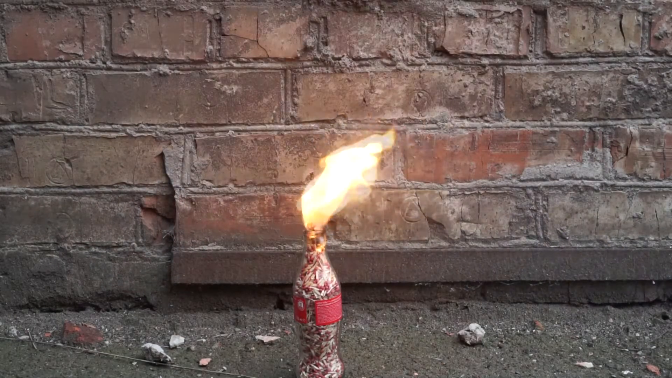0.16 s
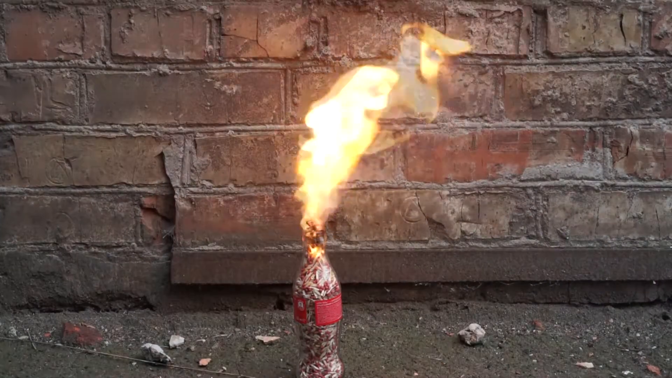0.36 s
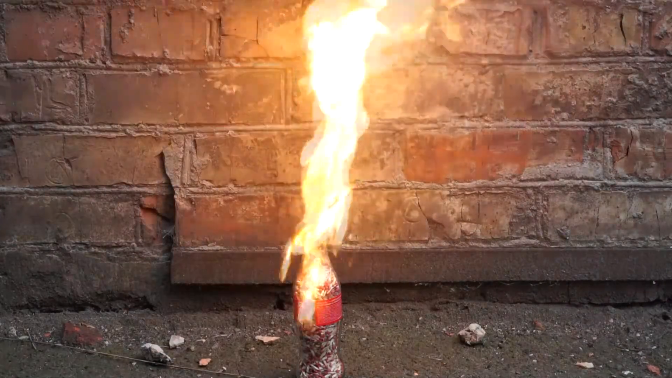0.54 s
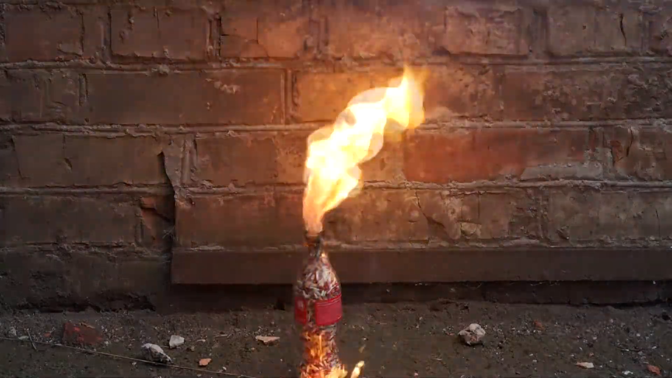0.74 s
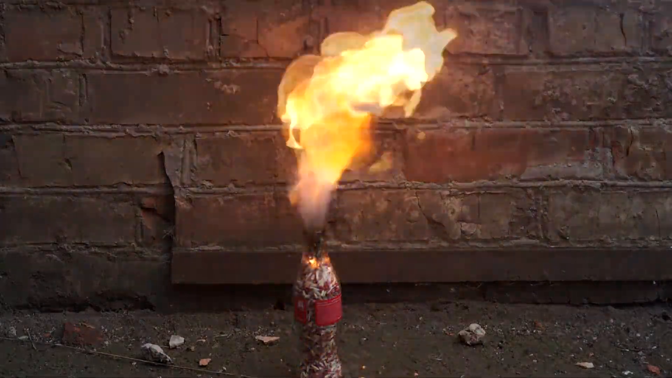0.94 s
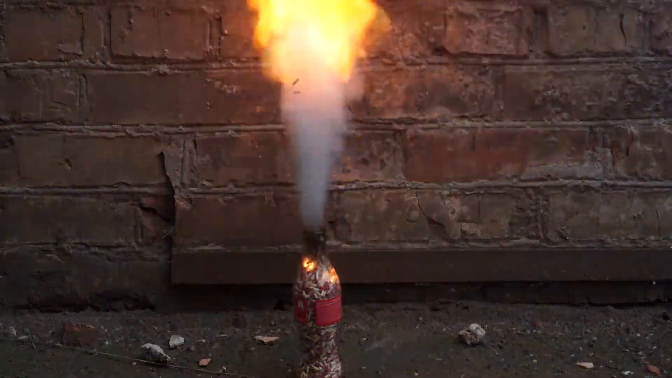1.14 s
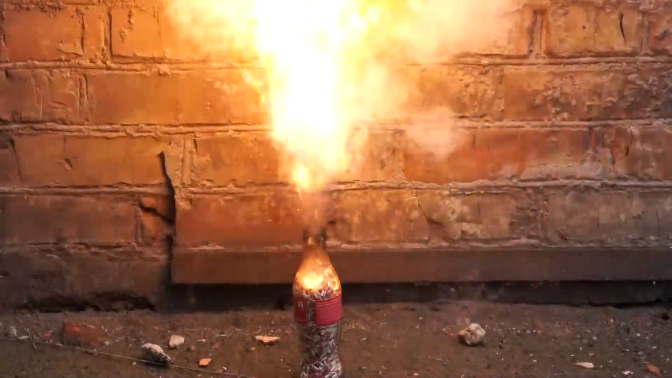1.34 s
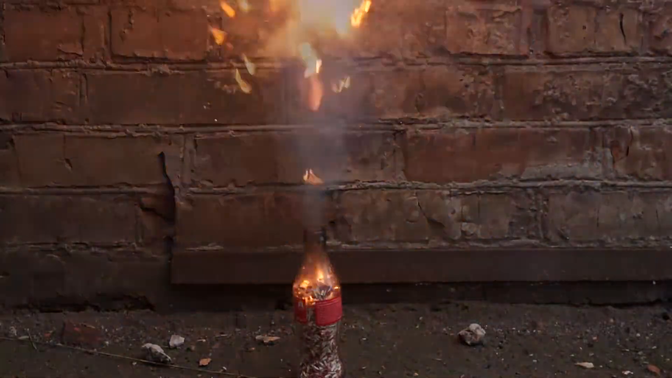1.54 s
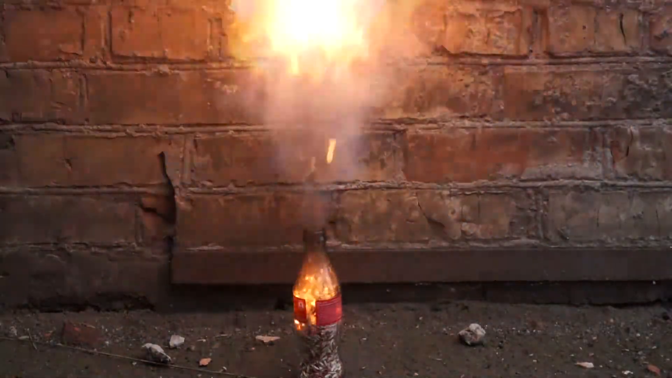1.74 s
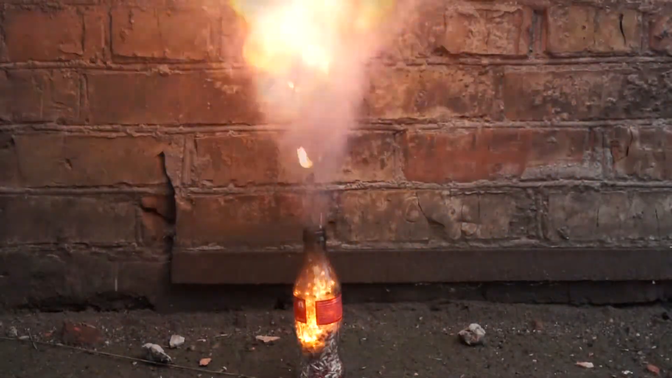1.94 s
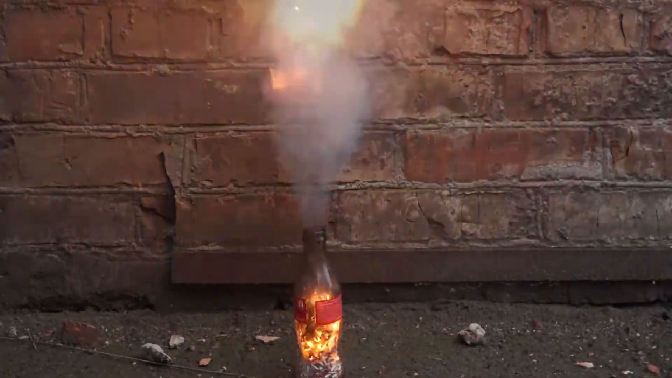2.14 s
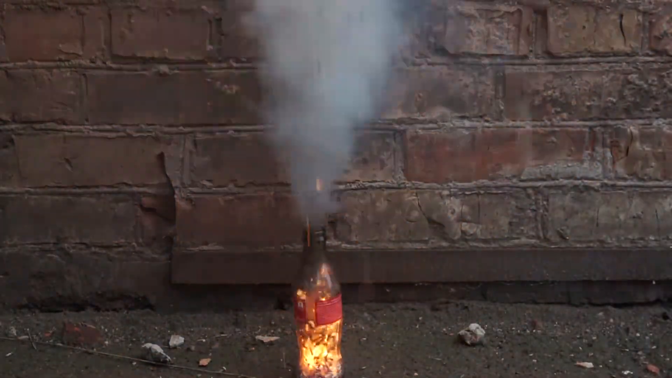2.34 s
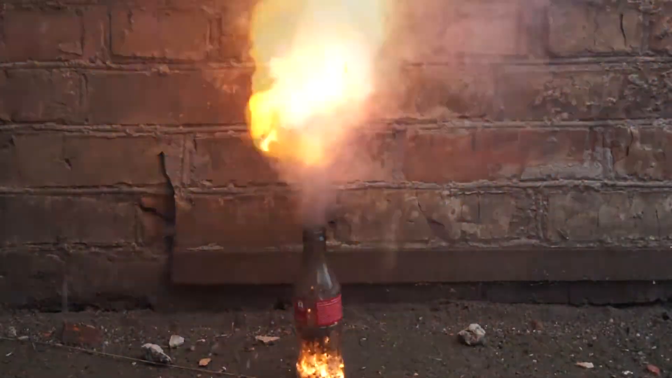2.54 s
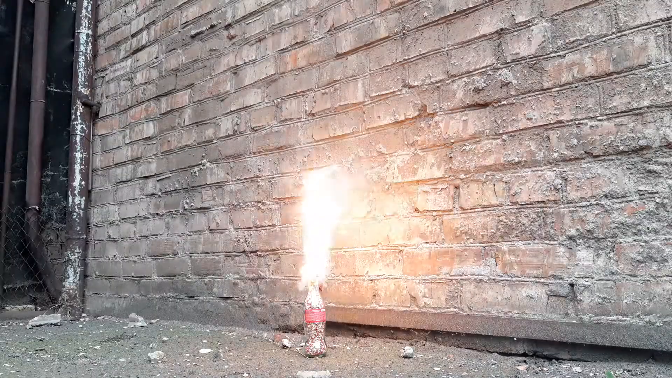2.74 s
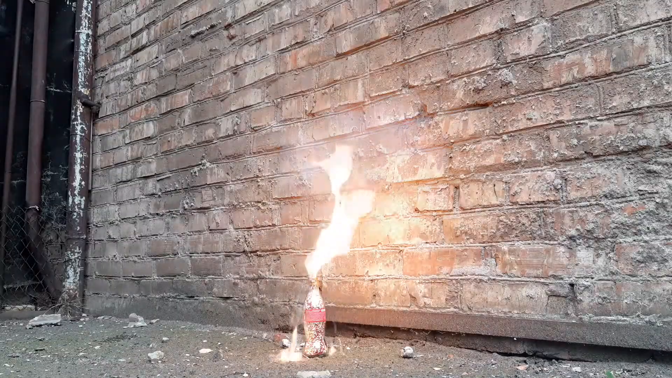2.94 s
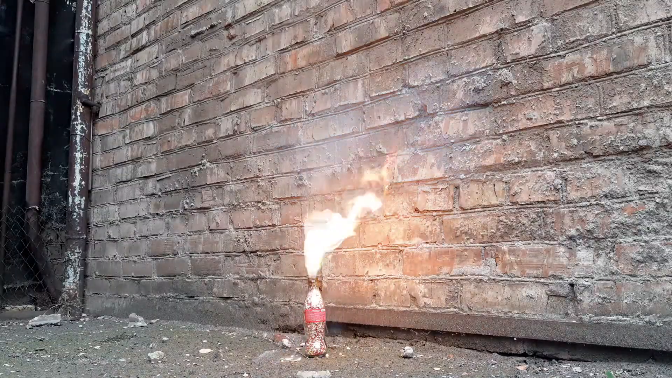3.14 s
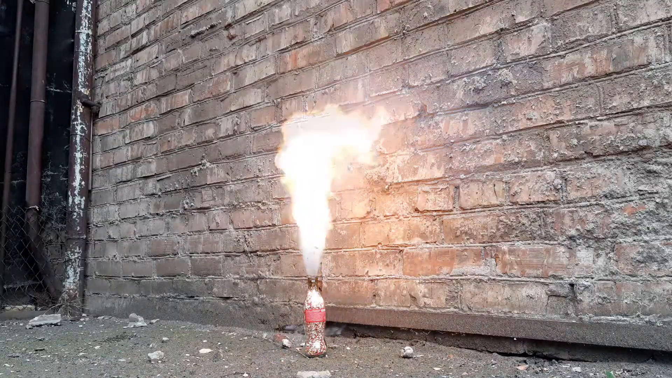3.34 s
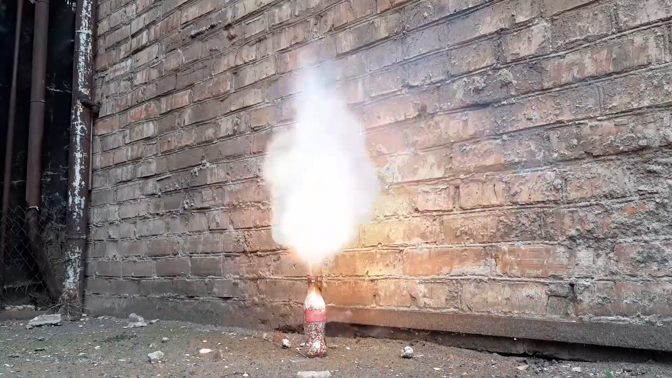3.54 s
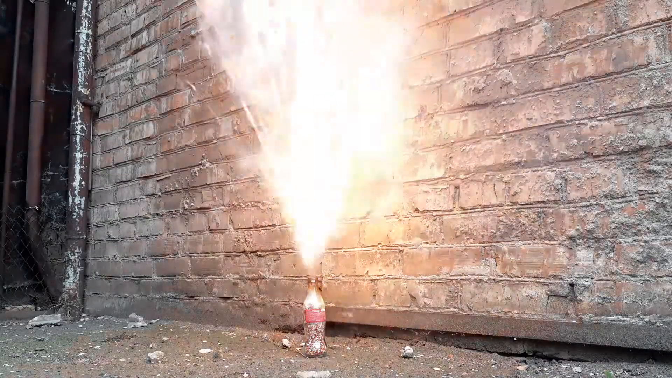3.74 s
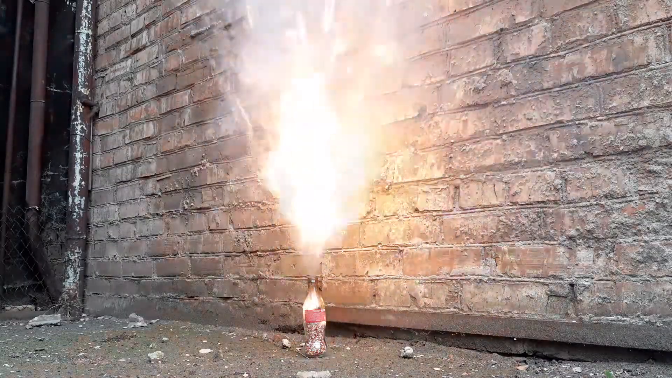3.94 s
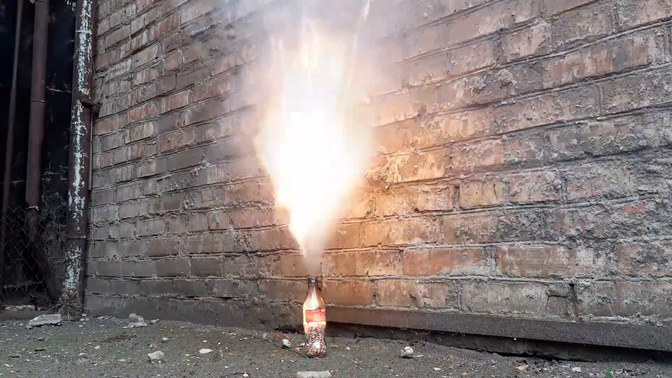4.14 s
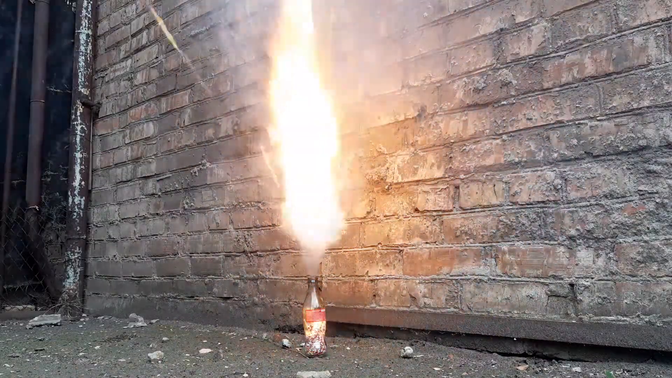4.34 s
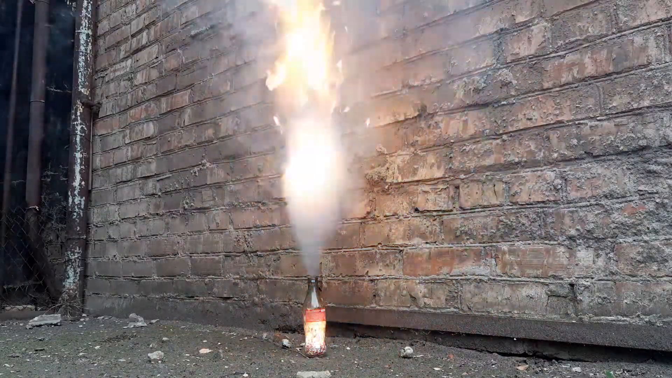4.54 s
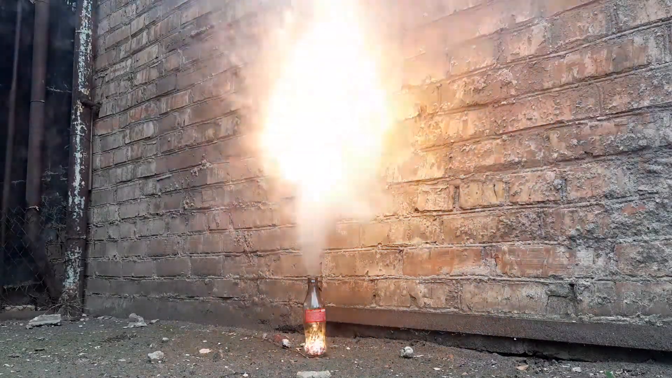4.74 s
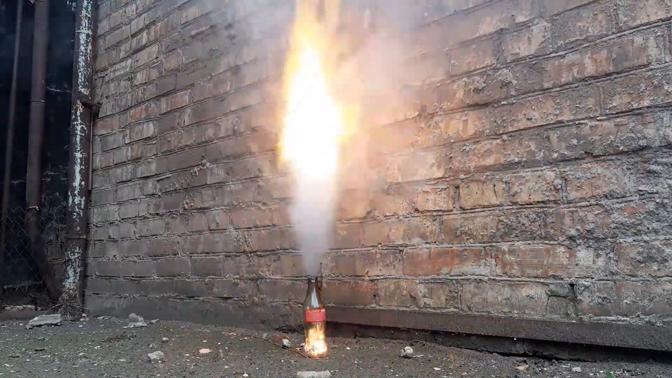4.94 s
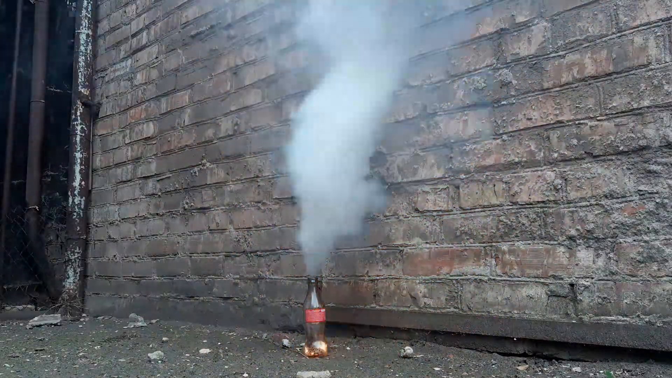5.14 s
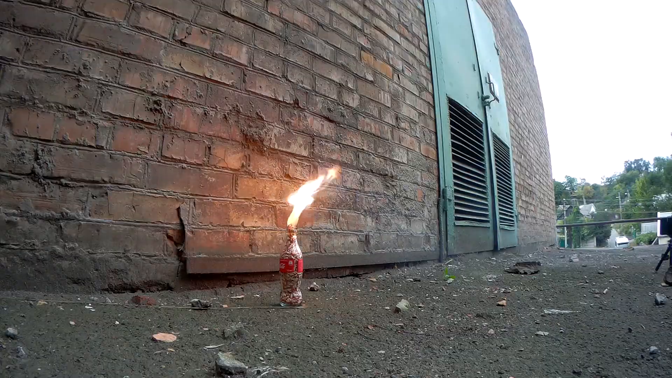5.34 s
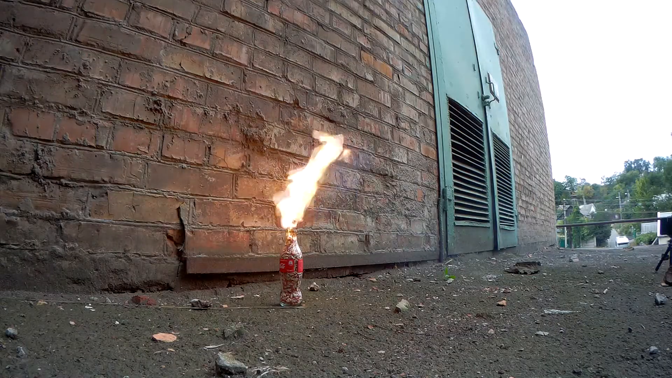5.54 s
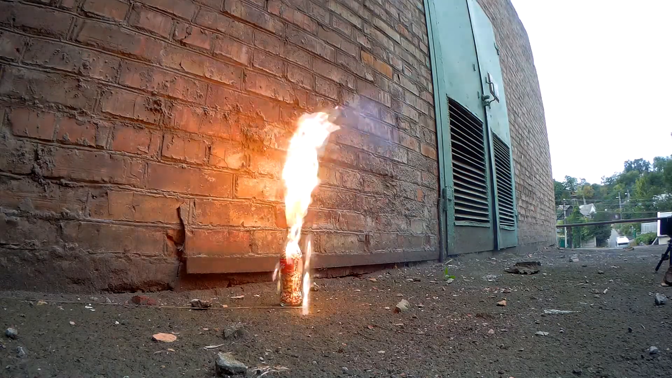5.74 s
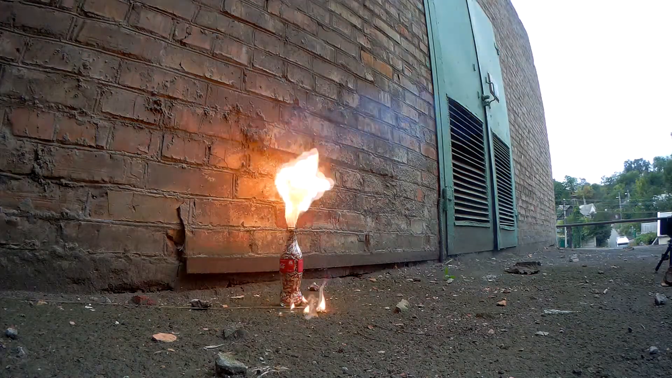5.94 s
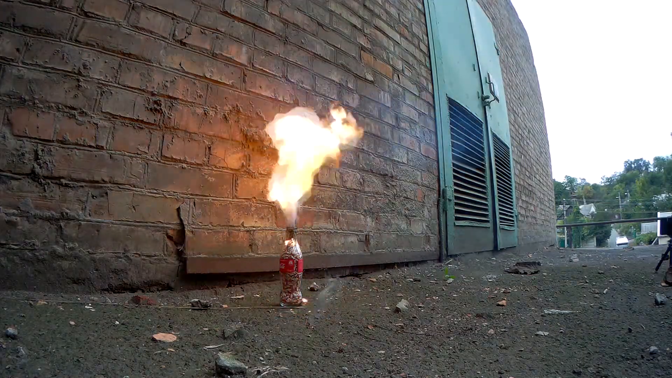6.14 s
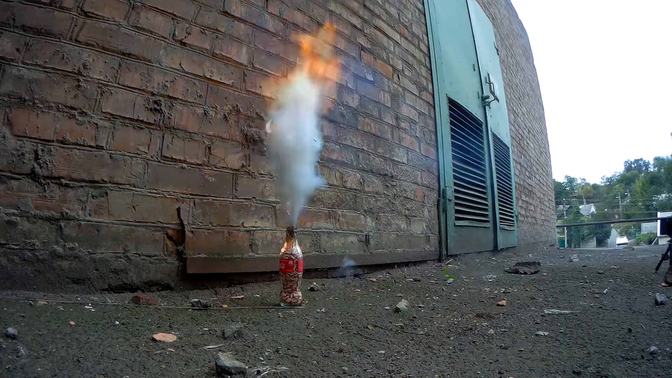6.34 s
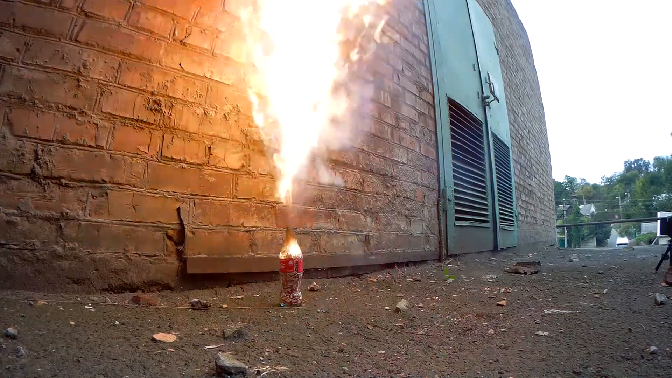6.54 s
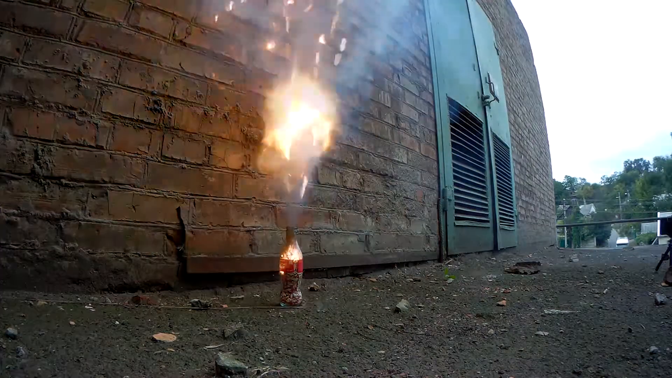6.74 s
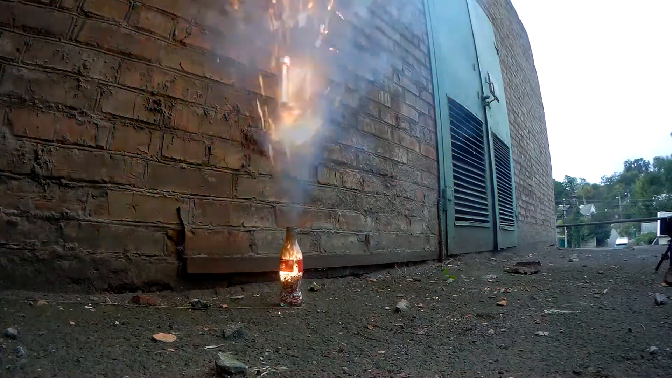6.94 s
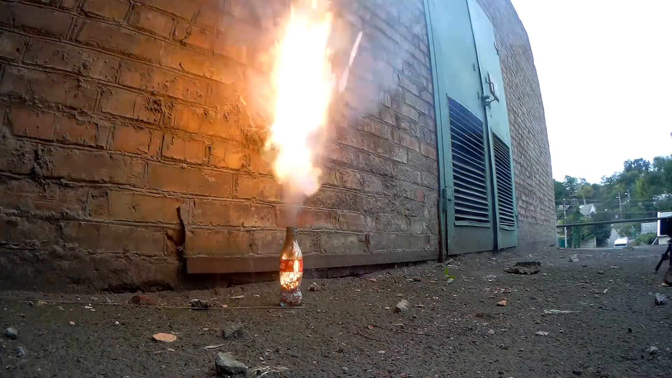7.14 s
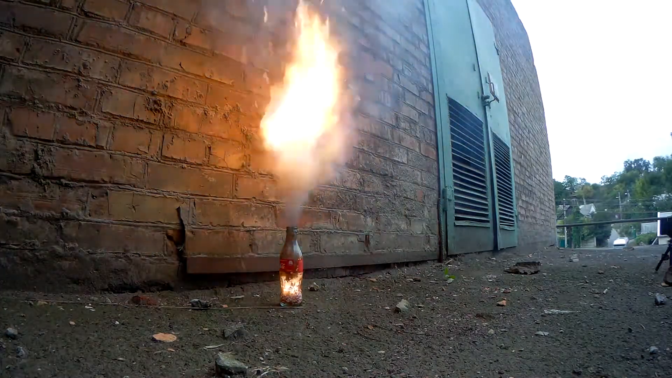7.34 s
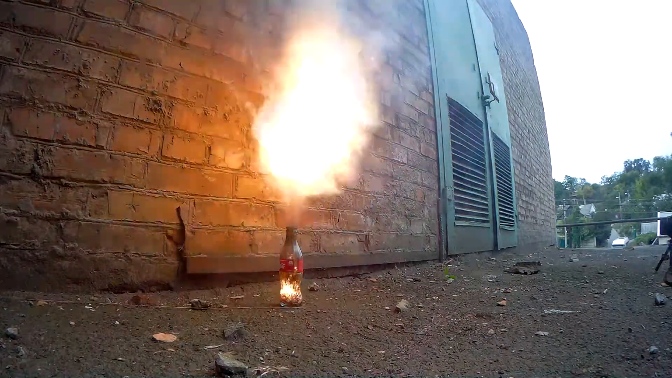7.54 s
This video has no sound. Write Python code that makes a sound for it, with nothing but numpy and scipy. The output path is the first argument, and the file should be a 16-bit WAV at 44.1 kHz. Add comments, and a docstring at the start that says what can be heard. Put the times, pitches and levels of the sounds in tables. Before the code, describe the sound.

Three bottles of match heads burn in turn outdoors, each small flame flaring, then erupting into a hissing, fluttering roar with thumping puffs and snaps.

```python
"""In front of a brick wall, three plastic bottles packed with match heads burn, each in a scene of its own; the
scene changes at 2.58 s and 5.21 s. Each starts with a small flame that flares once; then the whole load
catches, roars up and burns down. The flames are layers of shaped noise. Gas hisses out of the neck as brighter
noise, coloured by the bottle, and its spurts lift the flame off until it catches again with a whump. Pressure
pulses make the puffs, a few sharp snaps cut through, and the strongest puffs overload the microphone."""
import sys
import numpy as np
from scipy import signal
from scipy.fft import rfft, irfft, next_fast_len
from scipy.io import wavfile
from scipy.ndimage import uniform_filter1d, map_coordinates

SR = 44100
rng = np.random.default_rng(int(sys.argv[2]) if len(sys.argv) > 2 else 0)


def put_to_file(sound):
    """Save the sound as 16-bit audio at rate SR, in the file named by the first command-line argument."""
    columns = np.atleast_2d(sound).T  # one column per channel
    safe = np.clip(columns, -1, 1)
    whole_steps = np.round(safe * 32767)
    wavfile.write(sys.argv[1], SR, whole_steps.astype(np.int16))


N = 338688
TIME = np.arange(N) / SR

# stereo width at each bottle, the last one mono: (frequency [Hz], side relative to mid [dB])
WIDTH = [
    [(60, -24), (200, -19.5), (400, -7), (800, -11), (4400, -8.5), (15000, -9.5)],
    [(60, -26), (200, -25), (380, -14.5), (700, -7.5), (2400, -9), (4400, -2), (8100, 2), (15000, 6.5)],
    [(60, -120), (15000, -120)],
]
# each burn, roar levels before the mix: (time the load catches [s], growth time [s], time it dies [s],
# small flame [dB], full roar [dB], sag [dB/s])
BURNS = [(0.93, 0.089, 2.57, -41, -12.5, 2.5), (3.17, 0.14, 4.965, -52, -6, 5.5),
         (6.02, 0.15, 7.65, -53.5, -5.5, 3.5)]
# spurts of gas that lift the flame off the neck: (time it catches again [s], time lifted [s],
# drop of the roar [dB], swell of the hiss [dB])
SPURTS = [(1.324, 0.061, 12, 11.5), (1.663, 0.025, 19, 10), (1.735, 0.02, 9, 13.5), (1.786, 0.035, -2, 8.5),
          (1.87, 0.034, 11.5, 8), (1.915, 0.047, 2.5, 9), (2.24, 0.036, 13, -2.5), (2.362, 0.027, 15, 2.5),
          (2.445, 0.072, 16, 7), (3.356, 0.025, 10, -0.5), (3.546, 0.071, 16, 2.5), (3.882, 0.047, 10, 4),
          (3.952, 0.031, 4.5, 9.5), (4.002, 0.025, 3, 10), (4.093, 0.044, 10, 5), (4.136, 0.027, 11, 5.5),
          (4.458, 0.035, 10.5, 2), (4.581, 0.026, 12, 2), (4.66, 0.071, 14, 6), (4.826, 0.038, 9.5, 0),
          (6.243, 0.032, 7.5, -2), (6.425, 0.065, 10.5, 4.5), (6.759, 0.031, 13.5, 7.5),
          (6.787, 0.026, -5, 10.5), (6.836, 0.028, 10.5, 7), (6.884, 0.01, 9, 9), (6.97, 0.062, 8.5, 3),
          (7.018, 0.032, 7, 10), (7.144, 0.027, 11, -7), (7.336, 0.05, 6, 3), (7.458, 0.047, 10, -2),
          (7.537, 0.066, 17.5, 7.5)]


def amp(db):
    """Decibels to gain."""
    return 10 ** (np.asarray(db) / 20)


def unit(x):
    """Scale so that what the channels share has rms 1."""
    mid = np.atleast_2d(x).mean(axis=0)
    return x / np.sqrt(np.mean(mid ** 2) + 1e-20)


def along(points, hz):
    """Read (frequency, value) points on a log frequency axis."""
    point_hz, values = np.transpose(points)
    return np.interp(np.log(hz + 1), np.log(point_hz + 1), values)


def curves(rows, t):
    """Read each column after the time at the times t."""
    seconds, *columns = np.transpose(rows)
    return [np.interp(t, seconds, column) for column in columns]


def wobble(rate, t):
    """A smooth random curve with rate knots a second."""
    knots = (t - t[0]) * rate
    return map_coordinates(rng.standard_normal(2048), [knots], mode="mirror")


def filtered(x, response):
    """Multiply the spectrum of x by a response of frequency, without shifting its phase."""
    n = x.shape[-1]
    size = next_fast_len(n + 8192)
    spectrum = rfft(x, size) * response(np.fft.rfftfreq(size, 1 / SR))
    return irfft(spectrum, size)[..., :n]


def noise(spectrum, t, width):
    """Coloured stereo noise whose mid signal has rms 1."""
    def response(hz):
        colour = amp(along(spectrum, hz))
        return colour * [np.ones_like(hz), amp(along(width, hz))]

    mid, side = filtered(rng.standard_normal((2, len(t))), response)
    return unit(np.array([mid + side, mid - side]))


def evened(x, seconds):
    """Turbulence whose power holds steady over spans longer than seconds."""
    power = uniform_filter1d(np.mean(x ** 2, axis=0), max(int(seconds * SR), 8))
    return x / np.sqrt(np.abs(power) + 1e-6)


def distant_town(bottle, t):
    """Many far-off sources blur into a steady low noise."""
    # colour: (frequency [Hz], relative level [dB])
    town_colour = [(25, -21), (120, 1.5), (400, -3), (1000, -17), (2000, -19), (6000, -49), (10000, -31),
                   (15000, -46)]
    return amp(-46.5) * noise(town_colour, t, WIDTH[bottle])


def bricks(x, share=0.076, reach_s=0.02, count=8):
    """Ground, ledge and wall send back a handful of early copies."""
    delays_s = 0.002 + reach_s * rng.random(count)
    copies = sum(np.pad(x, ((0, 0), (int(d * SR), 0)))[:, :N] for d in delays_s)
    return x + share * copies


def neck_note(t, hz, db, width_hz=22, waver_db=4.0):
    """The air in the bottle hums softly and fitfully against the plug of gas in its neck."""
    hum = filtered(rng.standard_normal(len(t)), lambda f: 1 / (1 + ((f - hz) / width_hz) ** 2))
    return amp(db) * unit(hum * amp(waver_db * wobble(9.6, t)))


def snaps(grit=0.57):
    """Each snap is a sharp pressure step followed by a few milliseconds of spitting."""
    # snaps and clicks: (time [s], level [dB], time to fall 60 dB [s], then relative level [dB] at each snap_hz)
    snap_rows = [(2.576, -10.5, 0.0077, -28, -10.5, -3, -17, -13, -0.5, -5.5),
                 (2.611, -30, .016, -12, -7, -10, -14, -14, -5, -7),
                 (6.7814, -13, .012, -6, 4, -24, -34, -39, -48, -52),
                 (7.3577, -5.5, 0.011, -4, 1.5, -1, -19.5, -19, -50, -45),
                 (7.5613, -9, 0.012, -16, 8, -16, -15, -17, -57, -49)]
    # where the colour of a snap is set: (frequency [Hz])
    snap_hz = [800, 1800, 3800, 6200, 8400, 10000, 14000]
    out = np.zeros(N + SR)
    t = TIME[:SR // 20]
    for s, db, t60, *colour in snap_rows:
        fall = amp(-60 * t / t60)
        burst = grit * rng.standard_normal(len(t)) * fall / np.linalg.norm(fall)
        burst[0] += 0.6  # the pressure step
        # silence in front leaves room for the filter's spread ahead of the step
        padded = np.pad(burst, (len(t), 0))
        crack = filtered(padded, lambda hz: amp(along(np.c_[snap_hz, colour], hz)))
        crack *= np.linalg.norm(fall) / np.linalg.norm(crack)
        start = round(s * SR) - len(t)
        out[start:start + len(crack)] += amp(db) * crack
    return out[:N]


def puffs():
    """A pocket of gas goes up at once: one push of pressure between two shallow troughs."""
    # puffs: (time [s], push [dB], frequency [Hz])
    puff_rows = [(2.368, -6.5, 94), (2.549, -5, 120), (3.902, -11, 127), (4.015, -1.5, 151),
                 (4.27, -2, 158), (4.364, -8, 130), (4.59, -9.5, 114), (4.768, -1, 117), (6.599, 5, 200),
                 (6.783, 10, 126), (6.891, -0.5, 135), (7.016, 0, 105), (7.148, -4.5, 132),
                 (7.262, 1, 94.5), (7.363, -2, 107), (7.417, -0.5, 126), (7.463, 2.5, 94),
                 (7.644, 6.5, 118.2)]
    out = np.zeros(N)
    for s, db, hz in puff_rows:
        u = (np.pi * hz * (TIME - s)) ** 2
        out += amp(db) * (1 - 2 * u) * np.exp(-np.minimum(u, 50))
    return out


def outflow_db(bottle, t):
    """Gas leaves the neck as a hiss and feeds the rush of the plume above it."""
    # outflow of each bottle, before the mix: (time [s], hiss at the neck [dB], rush of the plume [dB])
    outflow_rows = [
        [(0, -38.5, -41.5), (0.28, -36, -45), (0.55, -33.5, -44), (0.87, -36, -46), (1.08, -22.5, -35),
         (1.22, -27.5, -36), (1.5, -29, -26), (1.7, -37, -33), (1.92, -32, -35), (2.07, -35, -34.5),
         (2.57, -43.5, -43)],
        [(2.58, -53.5, -53), (3.13, -54.5, -56.5), (3.29, -39, -39), (3.53, -36.5, -34.5), (3.72, -38.5, -24.5),
         (3.9, -44, -36.5), (4.17, -39, -29.5), (4.45, -48, -37.5), (4.93, -53, -40.5), (5.06, -57.5, -54.5),
         (5.2, -61, -72)],
        [(5.21, -45.5, -45), (5.7, -46, -44.5), (6.03, -45, -43.5), (6.17, -38, -29), (6.34, -33.5, -29),
         (6.46, -29.5, -20.5), (6.57, -36.5, -20.5), (6.68, -49, -31.5), (7.02, -44.5, -32),
         (7.3, -51.5, -36.5), (7.62, -45.5, -31), (7.68, -55, -46)],
    ]
    return curves(outflow_rows[bottle], t)


def spurt_db(t, lead=0.21, width=0.5):
    """The hiss changes, mostly swelling, while a spurt holds the flame off the neck."""
    total = 0
    for s, lifted, _, swell_db in SPURTS:
        # it peaks just before the catch; lead and width are shares of the time lifted
        total = total + swell_db * np.exp(-((t - s + lead * lifted) / (width * lifted)) ** 2)
    return total


def sizzle_db(bottle, t, bloom_db=2.5, bloom_after_s=0.3, bloom_width_s=0.14, fade_db_per_s=1.0):
    """The treble blooms as all the heads light at once, then the hiss dulls as the load burns down."""
    # treble share in each jet's hiss, before bloom, fade and spurts: (share [dB])
    sizzle_share = [-4, -7, -15]
    age = t - BURNS[bottle][0]
    bloom = bloom_db * np.exp(-((age - bloom_after_s) / bloom_width_s) ** 2)
    return sizzle_share[bottle] + bloom - fade_db_per_s * np.abs(age)


def in_bottle(x, bottle, t, roar_db, height_db, width_hz=150, drift=0.0072, patchy_db=2.1, size=1024):
    """The cavity colours the hiss while the flame is small; a roaring flow washes its resonances out."""
    # resonances of each bottle's cavity while it is cool: (frequency [Hz])
    cavity_hz = [
        [1670, 2420, 3170, 4700, 5550, 6900, 8680],
        [1590, 2200, 3240, 4250, 4870, 5700],
        [2580, 3100, 3280, 6750, 7700],
    ]
    warming_per_s, warmest = 0.057, 0.059  # shares by which the resonances rise
    mode_fade_hz = 11000  # the higher resonances stand out less
    hz, frame_s, z = signal.stft(x, SR, nperseg=size)
    hz = hz[:, None]
    calm = np.clip((-8 - np.interp(t[0] + frame_s, t, roar_db)) / 20, 0, 1)
    # hotter gas carries sound faster, so the resonances climb
    warmth = 1 + np.minimum(warming_per_s * frame_s, warmest) + drift * wobble(3.45, frame_s)
    peaks = np.max([np.exp(-0.5 * ((hz - f * warmth) / width_hz) ** 2) for f in cavity_hz[bottle]], axis=0)
    # random patches of louder and softer hiss, smoothed over frequency and then time
    patches = uniform_filter1d(rng.standard_normal(z.shape[1:]), size=6, axis=0)
    patches = uniform_filter1d(patches, size=16, axis=1)
    patches = unit(patches.ravel()).reshape(peaks.shape)
    relief_db = height_db * np.exp(-(hz / mode_fade_hz) ** 2)
    gain = amp(relief_db * calm * (peaks - 0.25) + patchy_db * patches)
    return unit(signal.istft(z * gain, SR, nperseg=size)[1][:, :len(t)])


def jet(bottle, t, hiss_db, roar_db, height_db):
    """Escaping gas hisses through the neck, with the fizz of countless heads catching."""
    # hiss of each jet: (frequency [Hz], relative level [dB])
    hiss_colour = [
        [(700, -18), (1350, -5.5), (1800, -1.5), (2600, -5.5), (3350, 0), (4000, -2), (5800, -5), (8200, -6),
         (12000, -10), (15800, -8)],
        [(1000, 2), (1800, -3.5), (2700, -3.5), (4800, -2.5), (6850, -4.5), (8300, -5.5), (9500, -13),
         (12500, -12.5), (15800, -16.5)],
        [(1200, -4), (2000, -8), (2700, -0.5), (3600, -1.5), (4700, -11.5), (5800, -7), (7200, -1), (8500, -9),
         (10000, -25), (12000, -20.5), (14000, -29), (15800, -36)],
    ]
    # where each jet sits: (left [dB], right [dB])
    jet_place = [(-.9, .8), (0, 0), (0, 0)]
    brightens = 0.22  # dB more treble share per dB of swell
    spurt = spurt_db(t)
    fizz = amp(0.84 * wobble(600, t))
    raw = noise(hiss_colour[bottle], t, WIDTH[bottle])
    gas = in_bottle(raw, bottle, t, roar_db, height_db) * fizz
    top = filtered(gas, lambda hz: np.clip((hz - 7500) / 3000, 0, 1))
    top_share = np.clip(amp(sizzle_db(bottle, t) + brightens * spurt), 0, 0.8)
    # the body gives up power as the top gains it
    blend = top_share * unit(top) + np.sqrt(1 - top_share ** 2) * unit(gas - top)
    hiss = amp(hiss_db + spurt + 1.04 * wobble(30.8, t)) * blend
    return amp(jet_place[bottle])[:, None] * hiss


def flare_db(t, fall_s=0.21):
    """The small flame flares up quickly and sinks back slowly."""
    # flares: (time [s], rise [s], swell of the roar [dB])
    flare_rows = [(0.44, 0.077, 15), (2.63, 0.02, 25.5), (5.539, 0.072, 22.5)]
    total = 0
    for s, rise, db in flare_rows:
        total = total + db * np.exp(-np.where(t < s, ((t - s) / rise) ** 2, (t - s) / fall_s))
    return total


def burn_db(bottle, t, die_db_per_s=329):
    """The roar grows out of the small flame, sags as the load is used up, then collapses."""
    catches, growth, dies, small_db, full_db, sag_db_per_s = BURNS[bottle]
    age = np.maximum(t - catches, 0)
    grown = (full_db - small_db) * (1 - np.exp(-age / growth))
    above = grown - sag_db_per_s * age - die_db_per_s * np.maximum(t - dies, 0)
    return small_db + np.maximum(above, 0)


def lift_db(t, fade=0.021, catch=0.0073, whump_db=3, settle=0.035):
    """The roar shifts, mostly fading, as the flame lifts off, then returns at once and overshoots."""
    db = np.zeros(len(t))
    for s, lifted, drop_db, _ in SPURTS:
        gone = np.clip((t - s + lifted) / fade + 0.5, 0, 1)
        back = np.clip((t - s) / catch + 0.5, 0, 1)
        db -= drop_db * gone * (1 - back)
        db += whump_db * back * np.exp(-np.abs(t - s) / settle)
    return db


def flame(bottle, t, roar_db, rush_db, eddies_db):
    """Turbulent burning gives a low roar and a higher rush; the eddies between them grow with both."""
    # roar of each flame: (frequency [Hz], relative level [dB per Hz])
    roar_colour = [
        [(15, -27), (30, -7), (60, 1), (120, 1.5), (170, 0.5), (220, -9.5), (300, -9.5), (400, -59), (800, -50)],
        [(15, -52), (30, -54), (60, -11), (85, -6.5), (110, 5), (155, -5.5), (220, -4.5), (300, -14.5),
         (400, -34), (800, -76)],
        [(15, -27), (30, -4), (60, -0.5), (125, 0), (170, 1), (220, -9.5), (300, -12.5), (400, -31), (800, -88)],
    ]
    # fast eddies of a hard-driven flame: (frequency [Hz], relative level [dB per Hz])
    eddy_colour = [(120, -25.5), (200, -1.5), (270, 3), (340, -2), (450, -8), (560, -19.5), (750, -26),
                   (1500, -80)]
    # rush of each plume: (frequency [Hz], relative level [dB per Hz])
    rush_colour = [
        [(150, -25), (350, -16), (470, 7), (600, 6.5), (850, 6.5), (1100, 2.5), (1400, -3.5), (2000, -2.5),
         (3500, -17), (9000, -44)],
        [(150, -6), (350, -11), (470, 2), (630, -10.5), (800, 4), (1100, -2), (1700, -17.5), (2300, -15.5),
         (4000, -23.5), (9000, -46)],
        [(150, -28), (350, -11), (450, -7.5), (600, -3.5), (820, 4.5), (1150, -0.5), (1600, -12.5), (2100, -14),
         (4000, -29.5), (9000, -61)],
    ]
    width = WIDTH[bottle]
    lift = lift_db(t)
    # a slack flame flaps in distinct lumps, a hard-driven one roars evenly
    slack = np.clip((-10.0 - rush_db) / 14, 0, 1)
    flutter = (0.2 + 2 * slack) * wobble(55, t)
    roar = amp(roar_db + lift + flutter) * evened(noise(roar_colour[bottle], t, width), seconds=0.0293)
    eddy_db = 0.47 * roar_db + rush_db + eddies_db
    eddies = amp(eddy_db + 0.97 * lift + flutter) * evened(noise(eddy_colour, t, width), seconds=0.04)
    rush_gain = amp(rush_db + 0.51 * lift + 0.62 * flutter + 1.67 * wobble(140, t))
    rush = rush_gain * noise(rush_colour[bottle], t, width)
    return amp(-1.5) * roar + amp(5.0) * eddies + amp(0.5) * rush


def scene():
    """The three burns are separate scenes played one after another: the scene changes at 2.58 s and at 5.21 s.
    Puffs and snaps sound on top."""
    # when each bottle is first heard: (time [s])
    starts = [0, 2.58, 5.21]
    # each bottle: (height of its resonances [dB], eddies before the mix [dB], neck note [Hz], neck note [dB])
    bottles = [(9.5, 5.5, 452, -44), (8.5, 12.5, 484, -55), (3, 7.5, 474, -50.5)]
    flare_rush, flare_hiss = 0.58, 0.4  # shares of a flare's swell that reach rush and hiss
    fire, gas = [], []
    spans = np.split(TIME, [round(s * SR) for s in starts[1:]])
    for bottle, t in enumerate(spans):
        height_db, eddies_db, note_hz, note_db = bottles[bottle]
        hiss_db, rush_db = outflow_db(bottle, t)
        flare = flare_db(t)
        roar_db = burn_db(bottle, t) + flare
        town = distant_town(bottle, t)
        note = neck_note(t, note_hz, note_db)
        hiss = jet(bottle, t, hiss_db + flare_hiss * flare, roar_db, height_db)
        plume = flame(bottle, t, roar_db, rush_db + flare_rush * flare, eddies_db)
        fire.append(plume + note + town)
        gas.append(hiss)
    return np.hstack(fire) + bricks(np.hstack(gas)) + puffs() + snaps()


def record(dry):
    """The microphone rounds off the tallest peaks; nothing passes above the band limit."""
    hardness, top_hz = 5, 15900
    squashed = dry / (1 + np.abs(dry) ** hardness) ** (1 / hardness)
    return filtered(squashed, lambda hz: hz < top_hz)


dry = scene()
out = record(dry)
put_to_file(out)
```